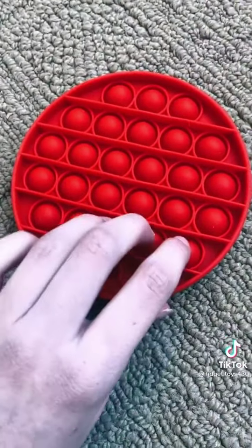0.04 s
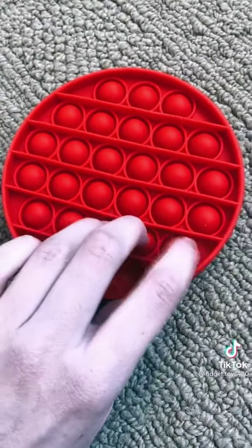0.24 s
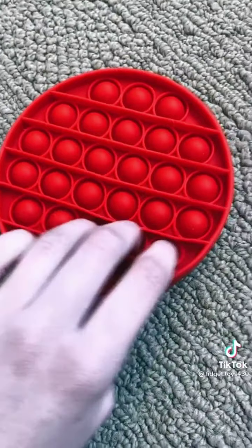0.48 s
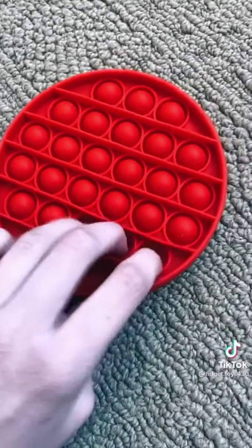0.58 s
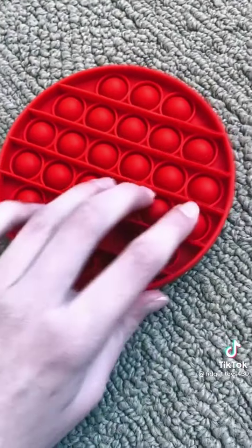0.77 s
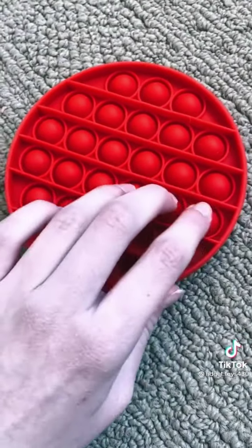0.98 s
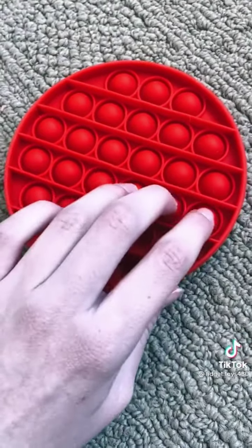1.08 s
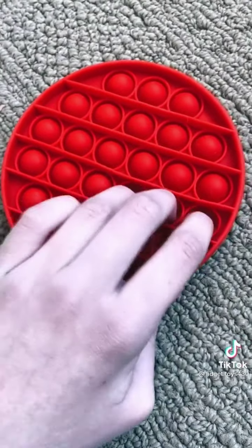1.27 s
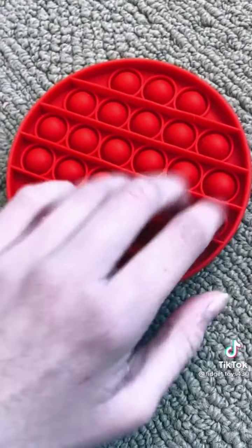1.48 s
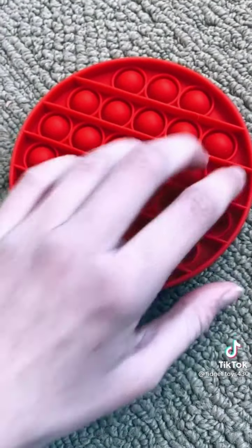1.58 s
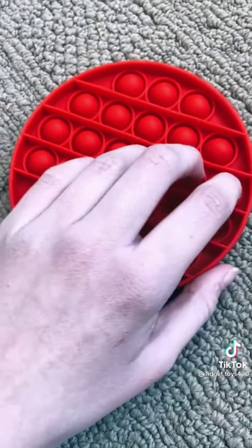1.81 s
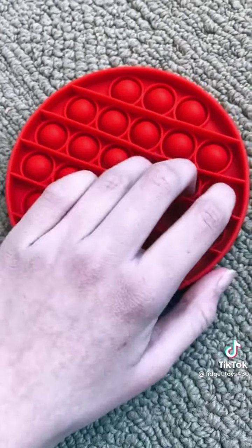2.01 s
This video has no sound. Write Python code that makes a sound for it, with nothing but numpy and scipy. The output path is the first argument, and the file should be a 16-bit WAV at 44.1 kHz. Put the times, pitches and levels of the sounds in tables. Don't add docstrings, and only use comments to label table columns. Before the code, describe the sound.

Rubber domes of a bubble toy pop loudly under pressing fingers: one pop with a weaker follow-up, a pause, a tight cluster, another pause, then a double pop. Close phone microphone, small quiet room, faint hiss.

```python
import sys
import numpy as np
from scipy import signal
from scipy.io import wavfile

SR = 44100
rng = np.random.default_rng(int(sys.argv[2]) if len(sys.argv) > 2 else 0)


def magnitude_from_level(level_db):
    exponent = np.asarray(level_db, float) / 20
    return 10 ** exponent


def digitize_waveform(pressure):
    field = np.atleast_2d(pressure).T
    bounded = np.clip(field, -1, 1)
    quanta = np.round(bounded * 32767).astype(np.int16)
    wavfile.write(sys.argv[1], SR, quanta)


N = 90404

# frequency in Hz, level in dB per Hz.
ROOM_TONE_SPECTRUM = [(29, -26.5), (50, 3.5), (783, -16.5), (863, -23.5), (1700, -16.5), (2010, -19.5),
                      (8540, -27.5), (16000, -36.5)]
ROOM_TONE_DB, ROOM_TONE_PATCHY_DB = -64.5, -2.5

# start in seconds, snap level in dB, dome pitch in Hz, swell in cycles, level
# of the sheet, carpet and floor below in dB.
DOME_POPS = [(0.0278, -51, 1970, 0.67, -63.5), (0.2124, -2, 2049, 0.875, -8.5),
             (0.2647, -18, 2000, 1.034, -21.5), (0.51, -50, 1700, 0.49, -45.5),
             (0.6803, -46.5, 2000, 0.93, -46.5), (0.702, -46.5, 1847, 1.31, -72),
             (1.1472, -13.5, 1635, 0.853, -24.5), (1.1515, -8, 1457, 0.794, -13.5),
             (1.1597, -7.5, 1566, 0.673, -17.5), (1.5051, -41, 2000, 1.077, -57.5),
             (1.5108, -40, 1856, 0.897, -59), (1.518, -60.5, 1896, 1.1, -72),
             (1.7734, -10.5, 1400, 1.335, -15.5), (1.786, -4.5, 1639, 0.857, -19.5),
             (2.0035, -34, 1836, 1.134, -71.5)]
# pitch in Hz, level in dB, swell time in seconds, lag in seconds.
UNDER_DOME = [
    (929, 0.5, 0.0011, 0.0008343),
    (604, -4, 0.0011, 0.0022),
    (336.4, -9, 0.0022, .003),
]
SNAP_SAG = 0.033
BOUNCE_S, BOUNCE_DB = 0.0013519, -13.5
CRACK_DB, CRACK_HZ, CRACK_WIDTH_HZ = 8.5, 2000, 3500

# time in seconds, level in dB, brightness in dB.
SLIDE_MOVES = [(0.12, -81.5, 9), (.15, -59, 11.5), (.17, -64, 0), (.34, -62.5, 2), (.4, -57.5, 10.5),
               (0.459, -55, 3), (0.524, -59, 4), (.56, -70.5, 6.5), (.63, -63, -3), (.79, -62, 0),
               (.83, -71, -5.5), (1.33, -65.5, 3), (1.38, -56, -3), (1.41, -81, 10), (1.56, -78, 11),
               (1.62, -74.5, 16.5), (1.9, -63, 0.5), (2.05, -70, 10)]
# pitch in Hz, width in Hz, level in dB.
DULL_RUBBER = [(250, 200, 1), (1000, 550, -4), (1667, 1700, -0.5), (5200, 1000, -7)]
# pitch in Hz, width in Hz, level in dB.
BRIGHT_RUBBER = [(8012, 7500, -9), (10640, 3100, -5)]
SLIPS_PER_S, SLIP_SPREAD_DB, SLIP_PATCHY_DB = 3600, 3.5, 1.5

# start in seconds, level in dB,
# pitch in Hz, swell in cycles, pitch sag as a share.
PATS = [(0.1792, -32.5, 923, 1.16, 0.52), (.2018, -21.5, 832, 0.77, 0.145),
        (0.557, -33, 179.2, 0.83, 0.092), (.575, -45, 160, 0.61, 0.14), (.593, -46.5, 147, 0.446, 0.088),
        (1.1418, -23, 1000, 1.168, 0.091), (1.527, -53.5, 179, 0.78, 0.128),
        (1.7549, -38, 710, 1.404, 0.398), (0.217, -21.5, 240, 0.762, 0.103),
        (0.268, -28.5, 237.4, 0.968, 0.134), (.684, -53.5, 250, 1.28, 0.0414),
        (1.1554, -25, 220.8, 1.43, .01), (1.777, -19.5, 422.7, 0.585, 0.12),
        (1.791, -32.5, 226.8, 1.197, 0.0333)]
FLOOR_HZ, FLOOR_DB, FLOOR_S, FLOOR_LAG_S = 71.156, -13, 0.0071, 0.0085
SETTLE_DB, SETTLE_SHARE = -9, 0.4

# start in seconds, level in dB,
# fall time in seconds, pitch in Hz, width as a share of pitch.
SKIN_PEELS = [(.2008, -52.5, .0012, 9500, .5), (0.2124, -29.5, 0.00189, 10060, 0.58),
              (.2582, -21, 0.000845, 9110, 0.233), (0.2637, -32.5, 0.0014, 9540, 0.11),
              (.5095, -50.5, 0.001308, 8530, 0.498), (.68, -55, .001, 10740, 0.33),
              (0.7017, -53.5, 0.00204, 9770, 1), (.779, -58.5, .002, 10580, 0.79),
              (1.1456, -44.5, .002, 11500, .3), (1.152, -22, 0.000925, 10000, 0.33),
              (1.159, -31, 0.0013, 8660, 0.58), (1.5035, -51, .001, 10780, .4),
              (1.7716, -43, 0.006, 11840, 0.41), (2.0039, -44.5, 0.0009, 9520, 0.505),
              (0.263, -31, 0.0023, 4600, .15), (1.1473, -25.5, 0.00163, 5000, 0.1364),
              (1.1476, -22, 0.001126, 3521, 0.195), (1.505, -56, 0.00124, 5200, 0.2144),
              (1.5107, -55.5, .002, 5060, 0.23), (1.7737, -28.5, 0.0016, 4640, 0.193),
              (1.7862, -21.5, 0.00203, 3426, 0.37), (1.7863, -21.5, 0.00077, 5200, 0.137),
              (2.0035, -40.5, 0.00103, 5200, 0.122), (0.2124, -30, .002, 5300, .4)]
PEEL_CLICK = 3.5

# frequency in Hz, level in dB, time to fall 60 dB in seconds.
ROOM_TAIL = [(70, -29, 0.19), (205, -22.5, .14), (407.93, -35.5, 0.17), (750, -23.5, .22),
             (1300, -32.5, 0.25), (2500, -26, .23), (5000, -26, .23), (12000, -29.5, 0.16)]
FIRST_WALL_S, FIRST_WALL_DB, FIRST_WALL_SMEAR_S = 0.0138, 0, 0.004
CARPET_SCATTER_S, CARPET_SCATTER_DB = 0.005, 13.5
ROOM_RING_HZ, ROOM_RING_WIDTH_HZ, ROOM_RING_DB = 1135, 120, 8
WALL_RING_DB, WALL_RING_S, FLUTTER_S, FLUTTER_LOSS_DB = -9, 0.0027, 0.0081, 4.5

MIC_LOW_HZ, MIC_HIGH_HZ, MIC_STOP_HZ = 52, 12800, 16500


def rms_one(x):
    return x / np.sqrt(np.mean(x ** 2) + 1e-20)


def at_hz(rows, hz, column=1):
    rows = np.array(rows)
    return np.interp(np.log(hz), np.log(rows[:, 0]), rows[:, column])


def drift(rate):
    return np.interp(np.arange(N) * rate / SR, np.arange(200), rng.standard_normal(200))


def third_octaves(white):
    edges = 22 * 2 ** np.arange(0, 9.7, 1 / 3)
    for k, (low, high) in enumerate(zip(edges, edges[1:])):
        band = signal.butter(2, [low, high], "band", fs=SR, output="sos")
        yield np.sqrt(low * high), signal.sosfilt(band, white[k % 2])


def resonance(x, hz, width_hz):
    r = np.exp(-np.pi * width_hz / SR)
    poles = [1, -2 * r * np.cos(2 * np.pi * hz / SR), r * r]
    return signal.lfilter([(1 - r * r) / 2, 0, (r * r - 1) / 2], poles, x)


def double_resonance(x, hz, width_hz, second_width_hz):
    return resonance(resonance(x, hz, width_hz), hz, second_width_hz)


def add(out, s, db, shape):
    i = int(round(s * SR))
    out[i:i + len(shape)] += magnitude_from_level(db) * shape


def swing(hz, tau_s, sag=0, order=2):
    u = np.arange(int(0.15 * SR)) / SR / tau_s
    sag = max(sag, 1e-3)
    swell = (u * np.exp(1 - u)) ** order
    return swell * np.sin(2 * np.pi * hz * tau_s * np.log1p(sag * u) / sag)


def room_tone():
    tone = 0
    for hz, band in third_octaves(rng.standard_normal((2, N + SR))):
        level_db = at_hz(ROOM_TONE_SPECTRUM, hz) + ROOM_TONE_PATCHY_DB * drift(9)
        tone = tone + magnitude_from_level(level_db) * band[SR:]
    return magnitude_from_level(ROOM_TONE_DB) * rms_one(tone)


def pops():
    out, crack = np.zeros((2, N + SR))
    chances = rng.standard_normal((len(DOME_POPS), 8))
    for (s, snap_db, hz, cycles, body_db), chance in zip(DOME_POPS, chances):
        snap = swing(hz * (1 + SNAP_SAG), cycles / hz, SNAP_SAG, order=3)
        add(out, s, snap_db, snap)
        add(out, s + BOUNCE_S, snap_db + BOUNCE_DB, snap)
        add(crack, s, snap_db + CRACK_DB, np.ones(1))
        for k, (mode_hz, db, tau_s, lag_s) in enumerate(UNDER_DOME):
            body = swing(mode_hz * (1 + 0.02 * chance[k + 4]), tau_s)
            add(out, s + lag_s, body_db + db + 1.5 * chance[k], body)
    crack = double_resonance(crack[:N] + 1e-18, CRACK_HZ, CRACK_WIDTH_HZ, CRACK_WIDTH_HZ)
    return out[:N], crack


def rubber(slips, rows):
    out = 0
    for k, (hz, width_hz, db) in enumerate(rows):
        ring = rms_one(double_resonance(slips, hz, width_hz, 2 * width_hz))
        out = out + magnitude_from_level(db + SLIP_PATCHY_DB * drift(34)) * ring * (-1) ** k
    return out


def slide():
    s, db, bright_db = np.transpose(SLIDE_MOVES)
    t = np.arange(N) / SR
    happens = rng.random(N) < SLIPS_PER_S / SR
    strength = magnitude_from_level(SLIP_SPREAD_DB * np.minimum(rng.exponential(1, N), 4))
    slips = happens * strength * rng.choice([-1, 1], N)
    dull = rubber(slips, DULL_RUBBER)
    bright = rubber(slips, BRIGHT_RUBBER)
    return magnitude_from_level(np.interp(t, s, db) - 7.5) * (dull + magnitude_from_level(np.interp(t, s, bright_db)) * bright)


def touches():
    out = np.zeros(N + SR)
    for s, db, hz, cycles, sag in PATS:
        tau_s = cycles / hz
        add(out, s, db, -swing(hz, tau_s, sag))
        settle = swing(SETTLE_SHARE * hz, tau_s / SETTLE_SHARE, sag)
        add(out, s + tau_s * 2, db + SETTLE_DB, hz / 800 * settle)
        add(out, s + FLOOR_LAG_S, db + FLOOR_DB, 200 / hz * swing(FLOOR_HZ, FLOOR_S))
    return out[:N]


def peels():
    out, t = np.zeros(N + SR), np.arange(1000) / SR
    noises = rng.standard_normal((len(SKIN_PEELS), 1000))
    for (s, db, fall_s, hz, width), noise in zip(SKIN_PEELS, noises):
        noise = noise + PEEL_CLICK * (t == 0)
        crackle = rms_one(double_resonance(noise, hz, width * hz, width * hz * 2))
        add(out, s, db, crackle * np.exp(-t / fall_s))
    return out[:N]


def room(x, crack):
    t = np.arange(SR // 2) / SR
    tail = 0
    for hz, band in third_octaves(rng.standard_normal((2, len(t)))):
        fall_db = 60 * t / at_hz(ROOM_TAIL, hz, column=2)
        tail = tail + magnitude_from_level(at_hz(ROOM_TAIL, hz) - fall_db) * band
    late = np.clip(t - FIRST_WALL_S, 0, None)
    walls = (t >= FIRST_WALL_S) * (1 + magnitude_from_level(FIRST_WALL_DB) * np.exp(-late / FIRST_WALL_SMEAR_S))
    far = tail * walls
    far = far + magnitude_from_level(ROOM_RING_DB) * resonance(far, ROOM_RING_HZ, ROOM_RING_WIDTH_HZ)
    near = tail * magnitude_from_level(CARPET_SCATTER_DB) * np.exp(-t / CARPET_SCATTER_S)
    flutter = np.zeros(len(t))
    for k in range(4):
        ring = swing(ROOM_RING_HZ / (1 + 0.052 * (k % 2)), WALL_RING_S)
        add(flutter, FIRST_WALL_S + k * FLUTTER_S, WALL_RING_DB - k * FLUTTER_LOSS_DB, ring)
    wet = signal.fftconvolve(x + crack, far) + signal.fftconvolve(x, near)
    wet = wet + signal.fftconvolve(crack, flutter)
    return magnitude_from_level(-14.5) * wet[:N]


def scene():
    snaps, crack = pops()
    hand = snaps + peels() + touches()
    return (hand + room(hand, crack) + slide() + room_tone())[None, :]


def band_limit(x):
    return signal.sosfilt(signal.butter(12, 16410, fs=SR, output="sos"), x)


def record(dry):
    x = signal.sosfilt(signal.cheby2(10, 60, MIC_STOP_HZ, fs=SR, output="sos"), dry)
    x = signal.sosfilt(signal.butter(2, MIC_LOW_HZ, "high", fs=SR, output="sos"), x)
    x = signal.sosfilt(signal.butter(4, MIC_HIGH_HZ, fs=SR, output="sos"), x)
    return band_limit(x)


dry = scene()
out = record(dry)
digitize_waveform(out)
```